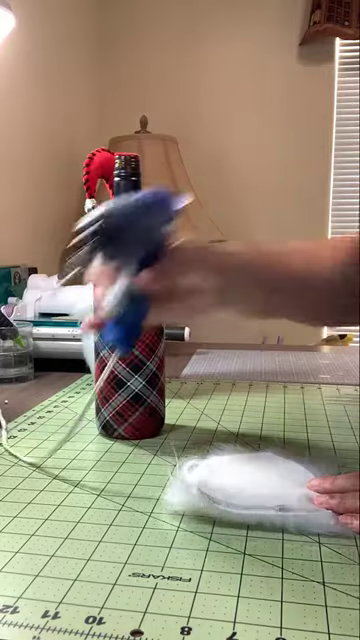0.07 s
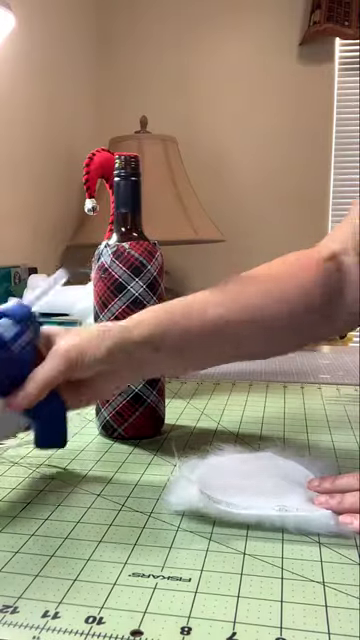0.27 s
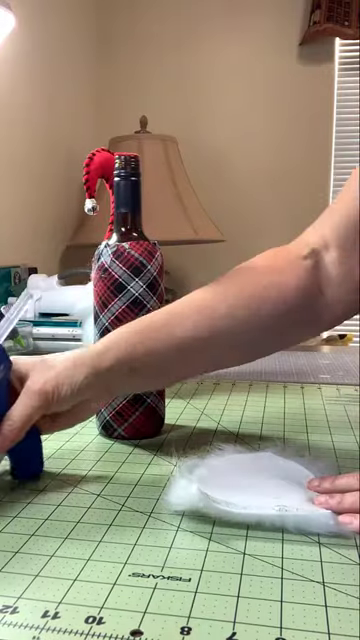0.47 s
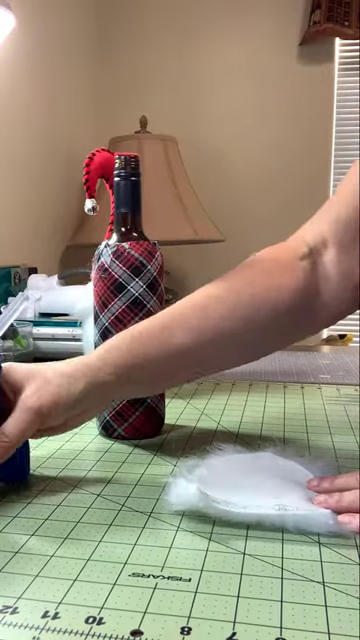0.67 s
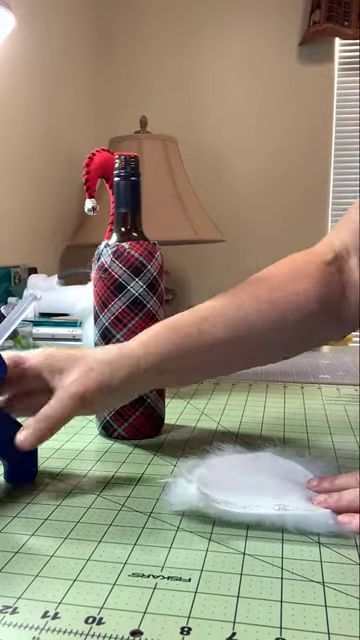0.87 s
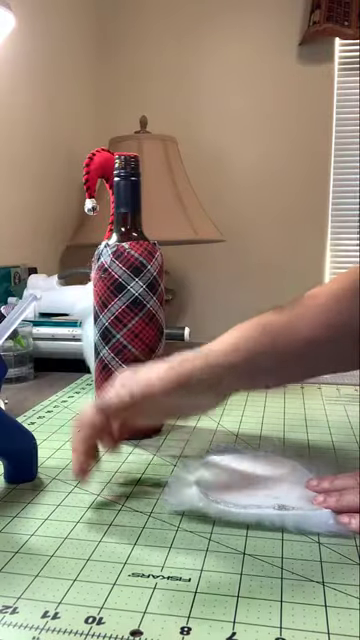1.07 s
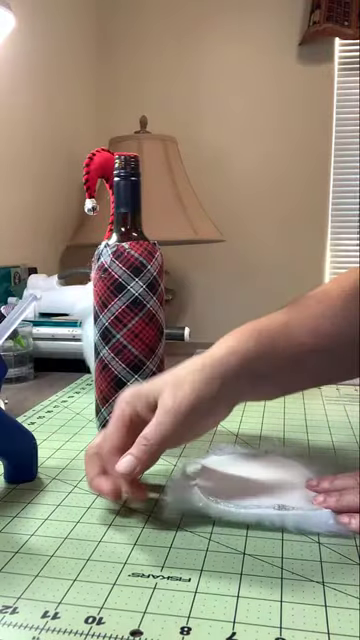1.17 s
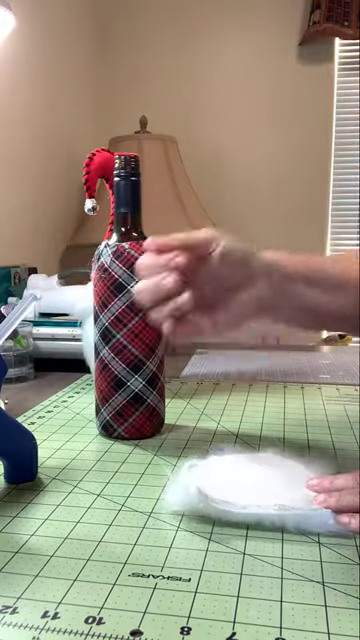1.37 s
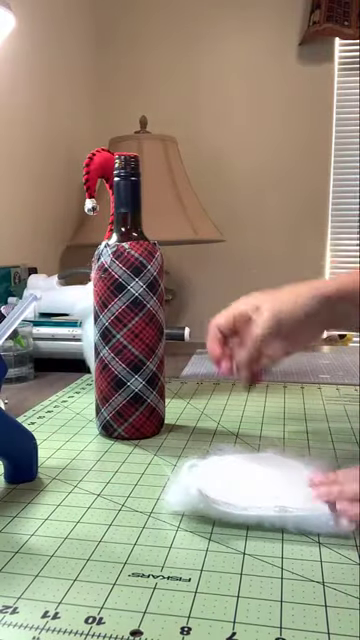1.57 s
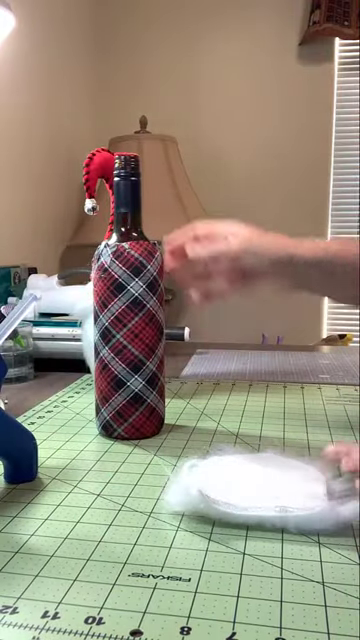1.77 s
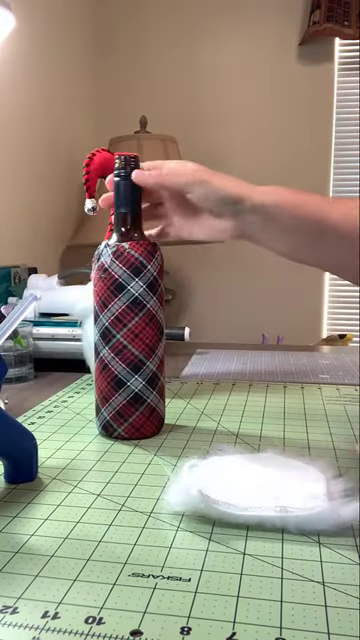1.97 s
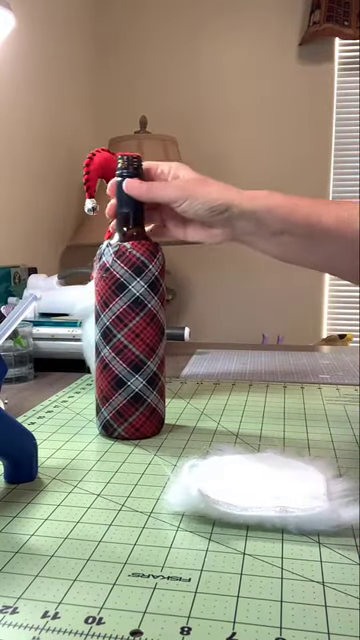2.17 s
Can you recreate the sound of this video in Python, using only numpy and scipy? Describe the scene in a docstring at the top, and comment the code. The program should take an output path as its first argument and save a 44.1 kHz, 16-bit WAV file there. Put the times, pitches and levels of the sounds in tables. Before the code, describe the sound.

A plastic glue gun clicks in the hand, then clacks down sharply onto a craft table.

```python
"""A plastic glue gun clicks in the hand, is set down on a craft table and settles on its wire stand.
Fingers then tick and brush, with short rough squeals as the hand slides across the mat towards a bottle.
Hard contacts are smeared clicks, struck modes and dying noise; ticks, rubs and squeals are shaped noise.
A small room answers the contacts and squeals, over a low rumble, a faint hum and a faint hiss."""
import sys
import numpy as np
from scipy import signal
from scipy.fft import rfft, irfft
from scipy.io import wavfile
from scipy.ndimage import uniform_filter1d

SR = 44100
rng = np.random.default_rng(int(sys.argv[2]) if len(sys.argv) > 2 else 0)


def bounce(signal):
    """Save signal as a 16-bit WAV file at the path given by the first command-line argument."""
    frames = np.transpose(np.atleast_2d(signal))
    limited = np.clip(frames, -1, 1)
    pcm = np.round(limited * 32767).astype(np.int16)
    wavfile.write(sys.argv[1], SR, pcm)


N = 97725  # length [samples]
T = np.arange(N) / SR  # time [s]
EDGES = np.geomspace(20, 17500, 25)  # band edges [Hz]
CENTRES = np.sqrt(EDGES[1:] * EDGES[:-1])
BANK = [signal.butter(2, pair, "band", fs=SR, output="sos") for pair in zip(EDGES, EDGES[1:])]


def amp(db):
    """Decibels to gain."""
    return 10 ** (np.asarray(db) / 20)


def unit(x):
    """Scale to rms 1."""
    return x / np.sqrt(np.mean(x ** 2) + 1e-20)


def dying(t60):
    """Exponential decay from 1, down 60 dB after t60 seconds."""
    return np.exp(-np.minimum(np.log(1000) * T / t60, 60))


def per_band(points):
    """Read a table over frequency at each band's centre."""
    hz, value = np.transpose(points)
    return np.interp(np.log(CENTRES), np.log(hz), value)


def bands(spectrum):
    """Coloured noise split into bands whose sum has rms 1."""
    white = rng.standard_normal((2, N))  # neighbouring bands take different noise
    gains = amp(per_band(spectrum))
    split = np.array([gain * signal.sosfilt(sos, white[k % 2])
                      for k, (sos, gain) in enumerate(zip(BANK, gains))])
    # reversed in time, so that the filters' build-up lies at the end
    return split[:, ::-1] / split.sum(0).std()


def noise(spectrum):
    """Coloured noise, rms 1."""
    return bands(spectrum).sum(0)


def resonant_noise(hz, width_hz):
    """Noise in one band centred on a resonance, rms 1."""
    low = np.hypot(hz, width_hz / 2) - width_hz / 2
    high = min(low + width_hz, EDGES[-1])
    sos = signal.butter(2, [low, high], "band", fs=SR, output="sos")
    return unit(signal.sosfilt(sos, rng.standard_normal(N)))


def delayed(x, s):
    """Start a sound s seconds later."""
    return np.concatenate([np.zeros(max(int(s * SR), 0)), x])[:N]


def ring(modes):
    """Struck modes: decaying sines with alternating signs."""
    out = np.zeros(N)
    for k, (hz, db, t60) in enumerate(modes):
        sign = -(-1) ** k
        out += sign * amp(db) * dying(t60) * np.sin(2 * np.pi * hz * T)
    return out


def crack(spectrum, db, t60):
    """Modes too crowded to tell apart: a dying burst of noise."""
    return amp(db) * dying(t60) * noise(spectrum)


def snap(spectrum):
    """One hard click, coloured by the shell and smeared by a few round trips inside it."""
    bin_hz = np.arange(N // 2 + 1) * SR / N
    log_gain = np.log(amp(np.interp(bin_hz, CENTRES, per_band(spectrum))))
    # minimum phase by way of the cepstrum: nothing sounds before the hit
    cepstrum = irfft(log_gain, N)
    cepstrum[0] /= 2
    click = irfft(np.exp(2 * rfft(cepstrum[:N // 2], N)), N) + 1e-18
    share = 0.62  # part that comes back on each round trip
    for ms in np.geomspace(.12, .45, num=3):
        loop = np.r_[1, np.zeros(int(ms * SR / 1000)), share]
        click = signal.lfilter(loop[::-1], loop, click)  # allpass: smears, keeps the colour
    return click


def glue_gun():
    """Each contact snaps and rings the shell, stand, table and frame; the heavy top swells a little later."""
    # the gun's contacts: (time [s], then the relative level [dB] of each layer:
    # plastic shell, hard crack, table top, wire stand, table frame)
    gun_contacts = [(.1150, -14, -15, -46, -23.5, -77), (0.4815, -12.5, 3.5, -16, -23.5, -31),
                    (0.6197, -42, -23, -59, -37.5, -56), (0.806, -37, -32, -50, -40.5, -56),
                    (1.149, -43, -16.5, -44, -27.5, -37.5)]
    # struck modes of each part: (frequency [Hz], relative level [dB], t60 [s])
    shell_modes = [(1916, -9.5, 0.0091), (2535, -11.5, 0.013), (2970, -7, 0.0078), (3620, -17.5, 0.016),
                   (5560, -13.5, 0.006), (8000, -34, 0.0067), (10240, -15, 0.0078)]
    top_modes = [(316, -7.5, 0.032), (380, -14, 0.22), (395, -6.5, 0.044), (454, -2.5, 0.049),
                 (529, -17, 0.15), (604, -11, 0.072), (711, -7, 0.049), (871, -9, 0.035)]
    stand_modes = [(4820, -18, 0.023), (6880, -22.5, 0.087), (7650, -16.5, 0.042), (8500, -22, 0.029),
                   (9220, -12, 0.027)]
    frame_modes = [(133.6, -4, 0.23), (282, -1.5, 0.032), (345, -1, 0.038)]
    # colour of each part's crowded, quickly dying modes: (frequency [Hz], relative level [dB per Hz])
    crack_colour = [(300, -12), (1300, -1), (2600, 0.5), (4300, -11), (6000, 0.5), (10000, -1),
                    (13000, -11), (16000, -17.5)]
    thud_colour = [(100, 4), (250, -2.5), (450, 4), (850, -5.5), (3000, -14), (8000, -28)]
    rattle_colour = [(500, -1.5), (1200, -6), (4300, -5.5), (8000, -4.5), (11000, -7.5), (16000, -38)]

    shell, top, stand, frame = ring(shell_modes), ring(top_modes), ring(stand_modes), ring(frame_modes)
    click = snap(crack_colour)
    swell = 1 - dying(0.011)
    out = np.zeros(N)
    for s, shell_db, crack_db, top_db, stand_db, frame_db in gun_contacts:
        thud = crack(thud_colour, db=-5.5, t60=0.044) + crack(thud_colour, db=-21.5, t60=0.27)
        rattle = crack(rattle_colour, db=-12.0, t60=0.071)
        blow = (amp(shell_db) * shell
                + amp(crack_db) * click
                + amp(top_db) * swell * (top + thud)
                + amp(stand_db) * (stand + rattle)
                + amp(frame_db) * frame)
        out += delayed(blow, s)
    return out


def ticks():
    """Light contacts of fingers, nails and loose parts, each a short noise burst in one resonance."""
    # (time [s], starting level [dB], centre [Hz], width [Hz], t60 [s])
    light_contacts = [(.003, -46.5, 4290, 150, 0.08), (0.07, -49, 3060, 3550, 0.053),
                      (0.062, -36, 60, 39.3, 0.17), (.295, -45.5, 11550, 400, 0.045),
                      (0.294, -45, 1800, 1910, 0.047), (0.4593, -38.5, 8900, 2500, 0.01),
                      (.806, -42.5, 1150, 600, 0.11), (1.8191, -31, 10900, 7450, 0.0059),
                      (1.8196, -40.5, 8500, 1400, 0.083), (1.84, -41.5, 99, 129, 0.075),
                      (1.855, -41, 1700, 850, 0.03), (1.9191, -41, 8400, 4500, 0.0076),
                      (1.954, -49, 9300, 2500, 0.0065), (2.054, -33.5, 2930, 890, 0.013),
                      (2.0548, -36, 7000, 5800, 0.0073), (2.142, -48, 1580, 3150, 0.027)]
    out = np.zeros(N)
    for s, db, hz, width_hz, t60 in light_contacts:
        burst = amp(db) * dying(t60) * resonant_noise(hz, width_hz)
        out += delayed(burst, s)
    return out


def squeals():
    """Short rough squeals as the hand slides across the mat: narrow noise bands that glide in pitch."""
    # (start [s], length [s], start pitch [Hz], end pitch [Hz], roughness width [Hz], level [dB])
    glides = [(1.866, .04, 2000, 2060, 340, -51.5), (1.905, 0.057, 1930, 2020, 280, -50),
              (1.965, .08, 1750, 1850, 550, -50), (1.925, .14, 3000, 2750, 800, -55)]
    out = np.zeros(N)
    for s, length, start_hz, end_hz, width_hz, db in glides:
        progress = np.clip((T - s) / length, 0, 1)
        glide_hz = start_hz + (end_hz - start_hz) * progress
        phase = 2 * np.pi * np.cumsum(glide_hz) / SR
        # slow noise on both quadratures widens the tone into a rough band
        lowpass = signal.butter(2, width_hz / 2, fs=SR, output="sos")
        waver = signal.sosfilt(lowpass, rng.standard_normal((2, N)))
        tone = unit(waver[0] * np.cos(phase) + waver[1] * np.sin(phase))
        arch = 2 * np.sqrt(progress * (1 - progress))  # silent at both ends, 1 in the middle
        out += amp(db) * arch * tone
    return out


def snags():
    """Brief random jumps in friction, each dying away, which make the rubbing uneven."""
    snags_per_s, jump_db, t60_s = 110, 2, .012
    jumps = (rng.random(N) < snags_per_s / SR) * rng.random(N)
    return unit(1 + amp(jump_db) * signal.fftconvolve(jumps, dying(t60_s))[:N])


def rubbing():
    """Skin on plastic and mat: strokes of grainy friction, with a rasping resonance and a hiss."""
    # strokes: (start [s], rise [s], hold [s], fall [s], body level before grain and snags [dB],
    # rasp centre [Hz], rasp width [Hz], rasp level before both [dB], hiss level before both [dB])
    strokes = [(-.03, 0.012, 0.017, 0.14, -55, 1650, 1060, -55.5, -59.5),
               (.14, 0.055, 0.0081, 0.04, -49, 3100, 1700, -52.5, -53),
               (0.083, 0.044, 0.086, 0.34, -55.5, 1730, 1640, -58, -59),
               (0.725, 0.09, 0.018, 0.19, -56.5, 1100, 1650, -54.5, -69),
               (1.721, 0.19, 0.14, 0.39, -53, 1850, 2400, -63, -60.5)]
    # colours of the friction: (frequency [Hz], relative level [dB per Hz])
    body_colour = [(80, -1.5), (200, -4), (450, 5.5), (2000, -7.5), (3200, -14.5), (4500, -19)]
    hiss_colour = [(1000, -40), (4500, -7.5), (6000, 4.5), (7000, -8), (8700, 0.5), (11500, -29),
                   (16000, -12.5)]

    body, hiss, out = noise(body_colour), noise(hiss_colour), np.zeros(N)
    for s, rise, hold, fall, db, hz, width_hz, rasp_db, hiss_db in strokes:
        stroke = np.interp(T, s + np.cumsum([0, rise, hold, fall]), [0, 1, 1, 0])
        # each stroke takes another stretch of the same noise
        friction = np.roll(amp(db) * body + amp(hiss_db) * hiss, rng.integers(N))
        rasp = amp(rasp_db) * resonant_noise(hz, width_hz)
        out += stroke * (friction + rasp)
    grain_db, grains_per_s = 0.5, 850
    grain = unit(uniform_filter1d(rng.standard_normal(N), max(int(SR / grains_per_s), 1)))
    return out * amp(grain_db * grain) * snags()


def room(x):
    """A few near echoes, then a diffuse noise tail that dies band by band."""
    # nearby surfaces: (delay [s], level [dB])
    surfaces = [(.0059, -14), (.0087, -16.5), (0.0112, -20)]
    # colour of the tail: (frequency [Hz], relative level [dB per Hz])
    tail_colour = [(100, 4.5), (400, 1), (1000, 0), (4300, -0.5), (10000, -3), (16000, 6)]
    # decay of the tail: (frequency [Hz], t60 [s])
    tail_t60 = [(2500, 0.44), (8000, 0.34), (16000, 0.12)]
    tail_db, gap_s = -9, .006

    tail = sum(band * dying(t60) for band, t60 in zip(bands(tail_colour), per_band(tail_t60)))
    tail = delayed(tail / np.linalg.norm(tail), gap_s)
    echoes = sum(amp(db) * delayed(x, s) for s, db in surfaces)
    return echoes + amp(tail_db) * signal.fftconvolve(x, tail)[:N]


def background():
    """Room air, a faint hum and a slow draught on the microphone, louder at the start."""
    # colour of the room air: (frequency [Hz], relative level [dB per Hz])
    air_colour = [(25, 1.5), (60, -8), (90, -17.5), (200, -18.5), (400, -25), (2000, -36), (4500, -43),
                  (8500, -40.5), (15500, -46.5)]
    # steady hum tones: (frequency [Hz], rms level [dB])
    hum_tones = [(60, -62), (1200, -76)]
    air_db, draught_db, draught_cutoff_hz = -53.5, -34.5, 5.58
    boost_db, boost_s = 15.5, 0.39  # the draught is louder at the start and settles over this time

    air = amp(air_db) * noise(air_colour)
    lowpass = signal.butter(2, draught_cutoff_hz, fs=SR, output="sos")
    draught = unit(signal.sosfilt(lowpass, rng.standard_normal(N)))
    boost = boost_db * np.exp(-(T / boost_s) ** 2)
    hum = sum(amp(db) * np.sqrt(2) * np.sin(2 * np.pi * hz * T) for hz, db in hum_tones)
    return air + amp(draught_db + boost) * draught + hum


def scene():
    """Contacts and squeals with the room's answer, rubbing and background, heard by one microphone."""
    contacts = glue_gun() + ticks() + squeals()
    return (contacts + room(contacts) + rubbing() + background())[None]


def record(dry):
    """A steep lowpass cuts the top of the spectrum."""
    cutoff_hz = 16700  # 60 dB down from here up
    return signal.sosfilt(signal.cheby2(16, 60, cutoff_hz, fs=SR, output="sos"), dry)


dry = scene()
out = record(dry)
bounce(out)
```